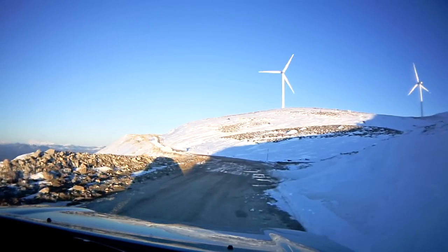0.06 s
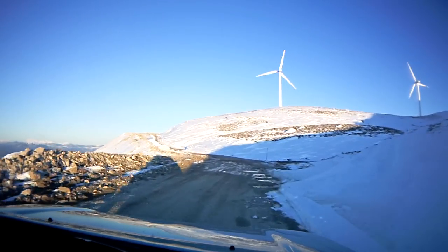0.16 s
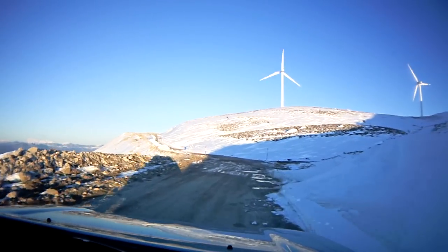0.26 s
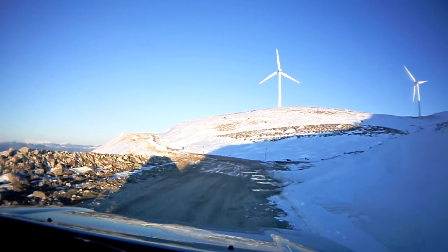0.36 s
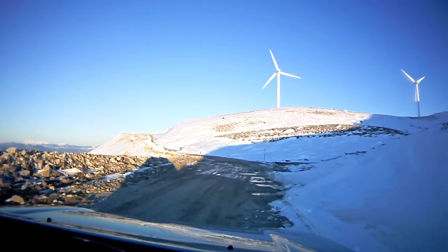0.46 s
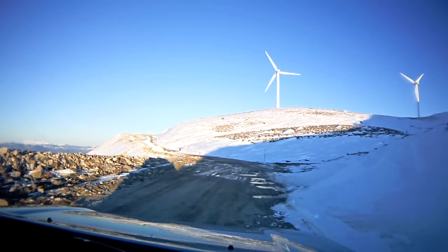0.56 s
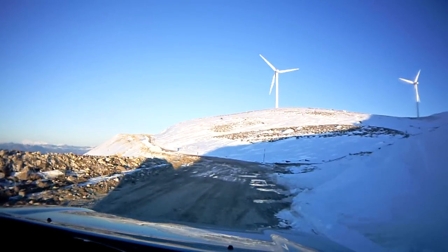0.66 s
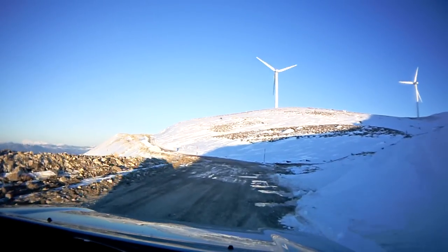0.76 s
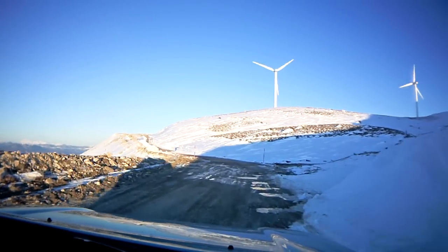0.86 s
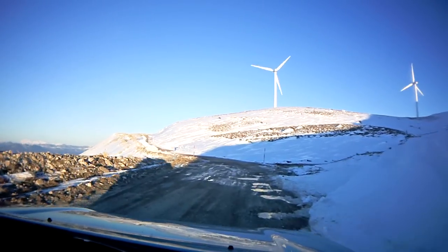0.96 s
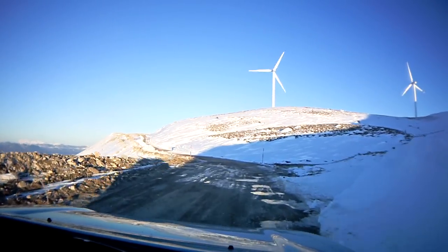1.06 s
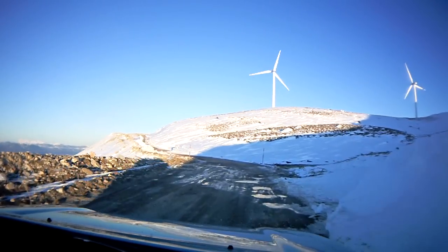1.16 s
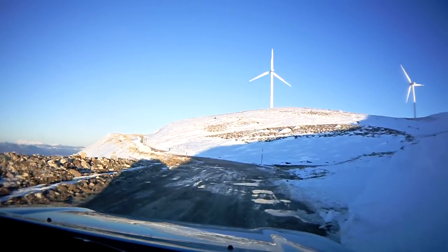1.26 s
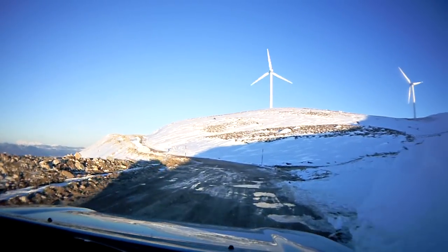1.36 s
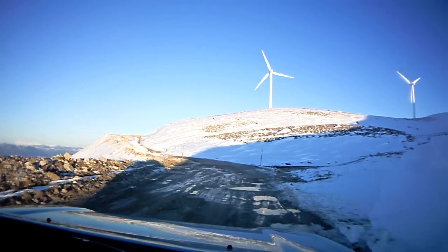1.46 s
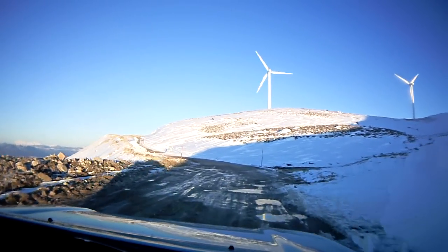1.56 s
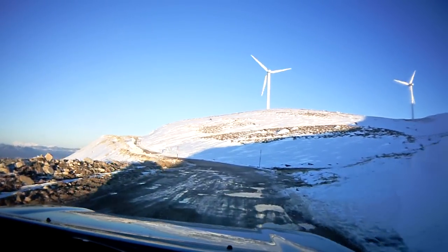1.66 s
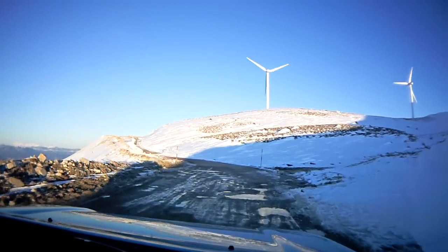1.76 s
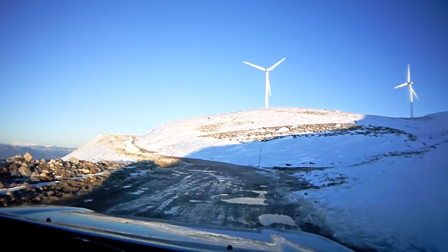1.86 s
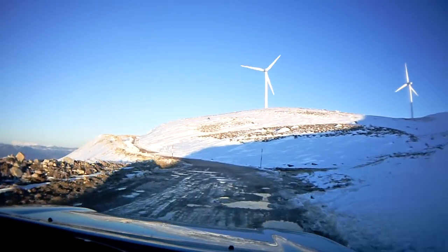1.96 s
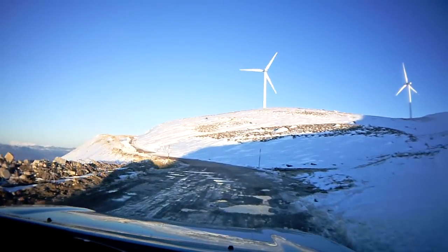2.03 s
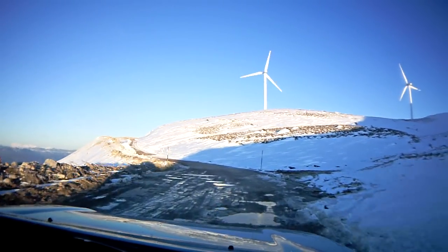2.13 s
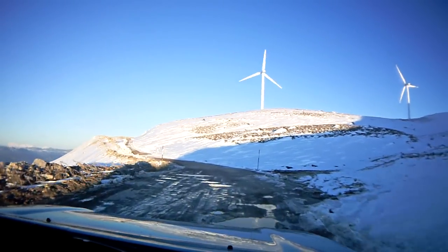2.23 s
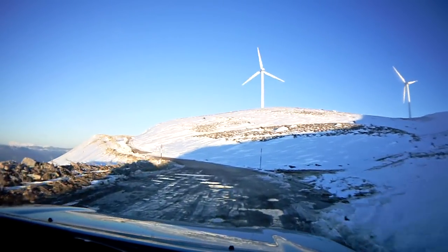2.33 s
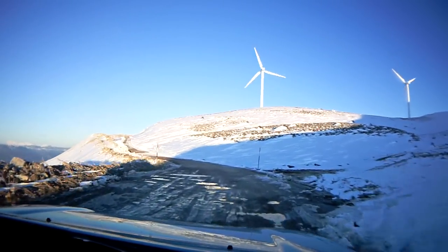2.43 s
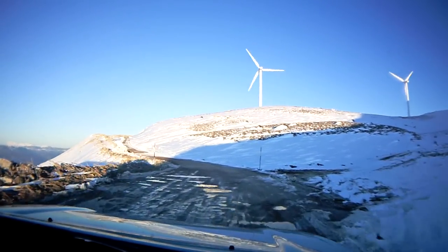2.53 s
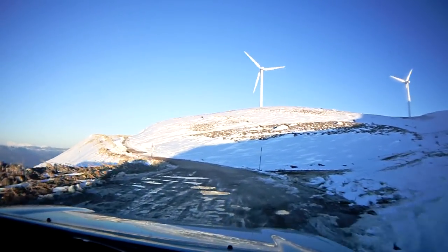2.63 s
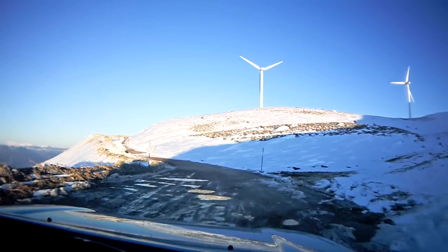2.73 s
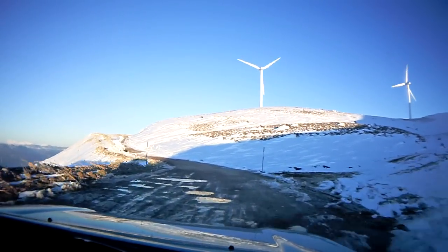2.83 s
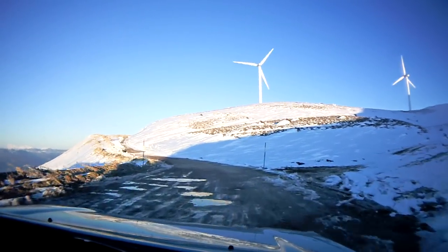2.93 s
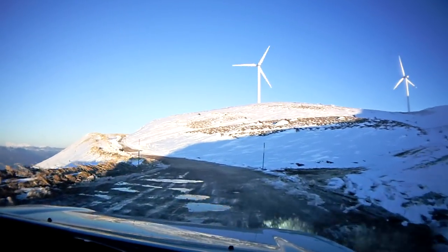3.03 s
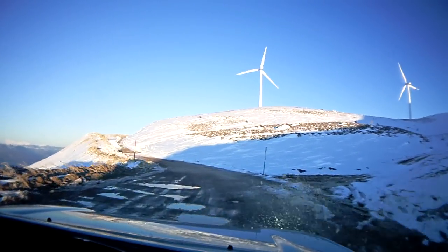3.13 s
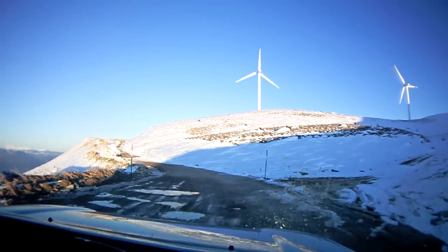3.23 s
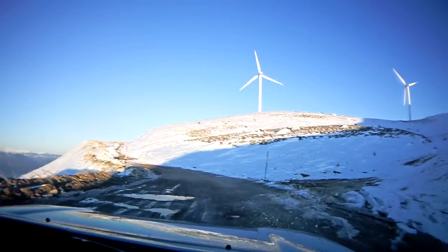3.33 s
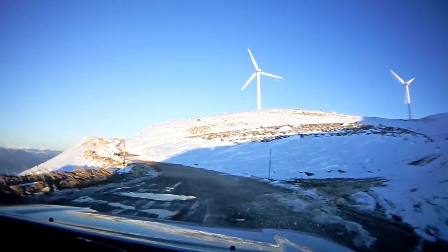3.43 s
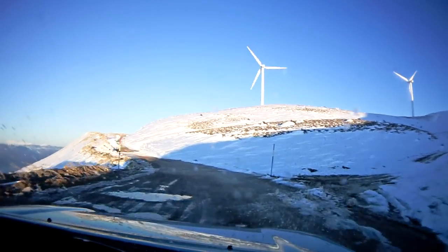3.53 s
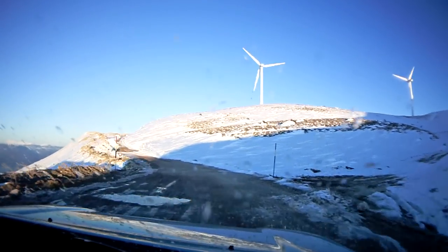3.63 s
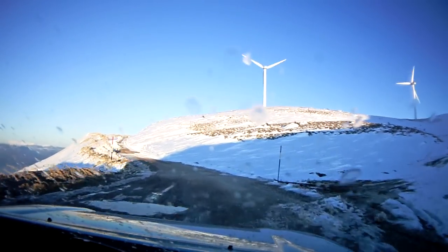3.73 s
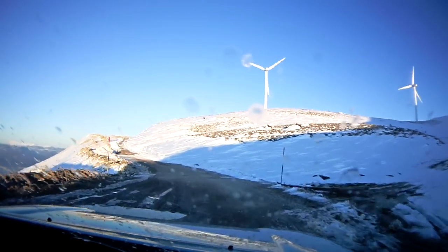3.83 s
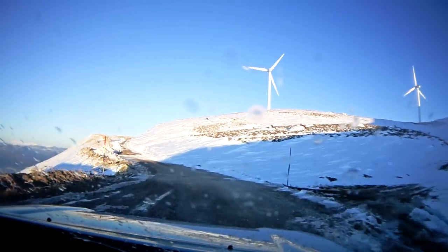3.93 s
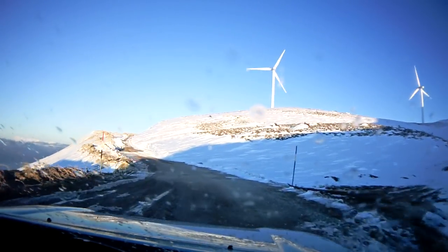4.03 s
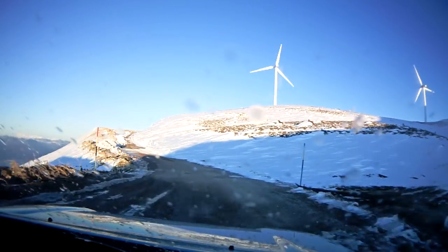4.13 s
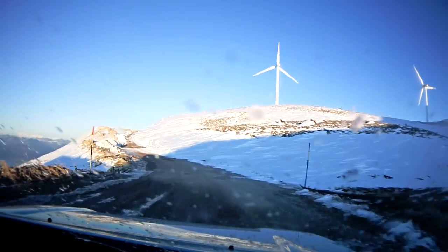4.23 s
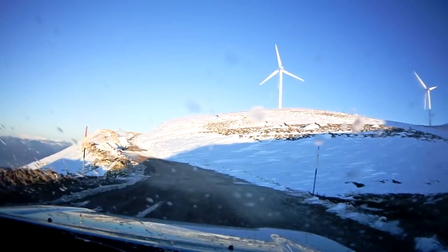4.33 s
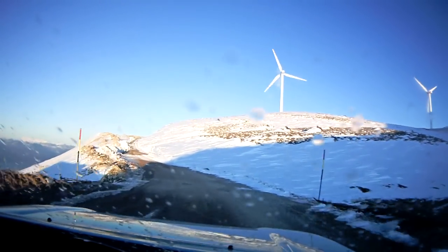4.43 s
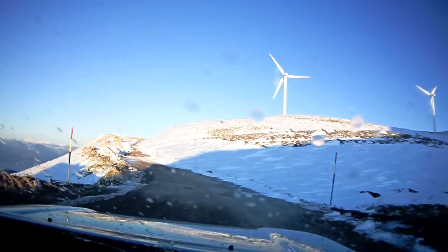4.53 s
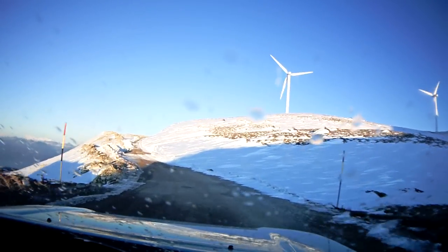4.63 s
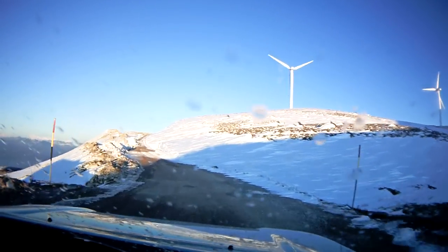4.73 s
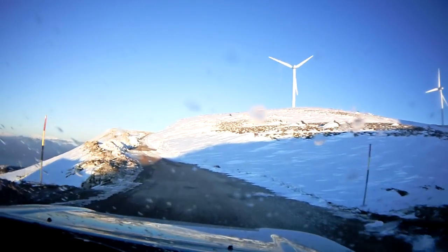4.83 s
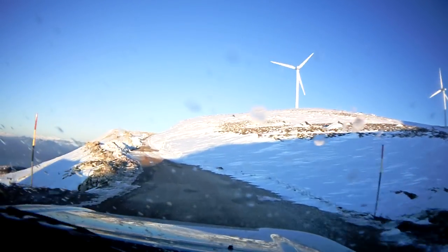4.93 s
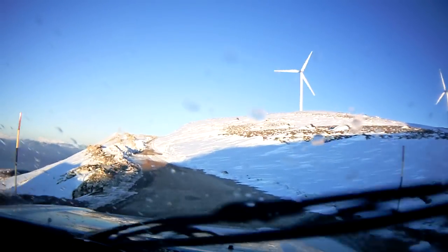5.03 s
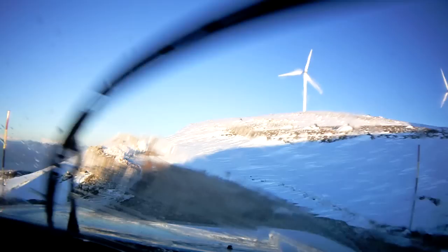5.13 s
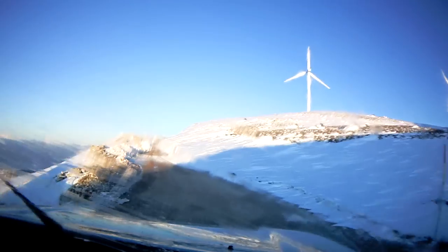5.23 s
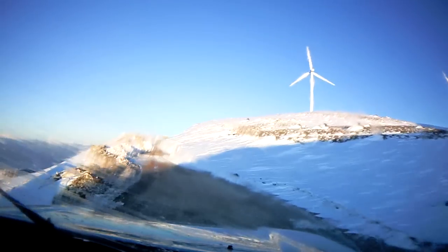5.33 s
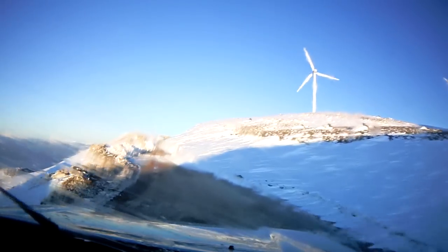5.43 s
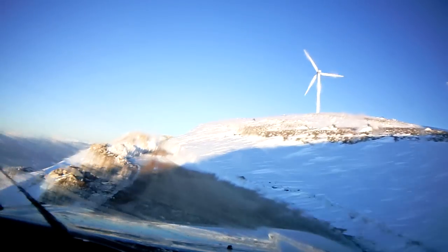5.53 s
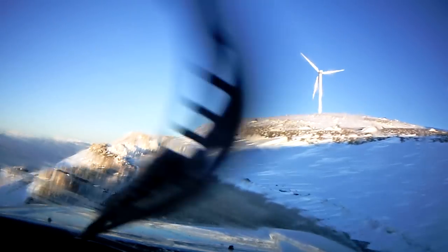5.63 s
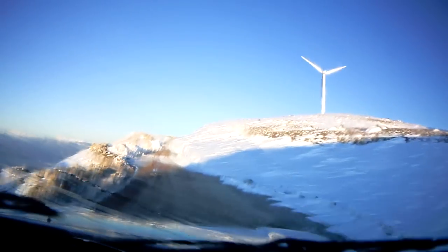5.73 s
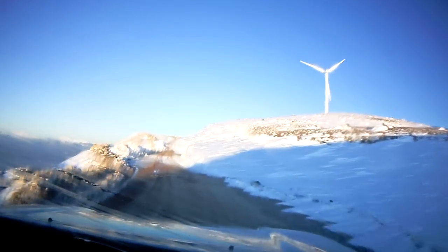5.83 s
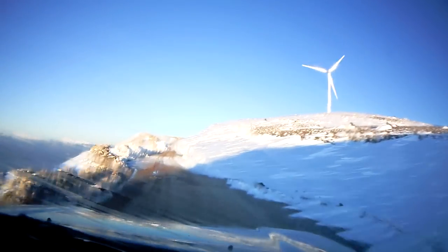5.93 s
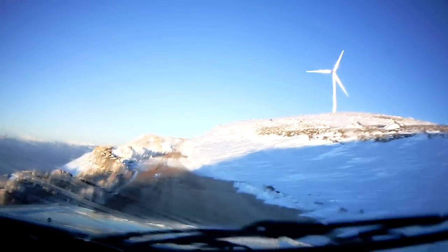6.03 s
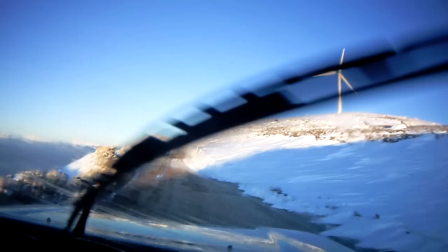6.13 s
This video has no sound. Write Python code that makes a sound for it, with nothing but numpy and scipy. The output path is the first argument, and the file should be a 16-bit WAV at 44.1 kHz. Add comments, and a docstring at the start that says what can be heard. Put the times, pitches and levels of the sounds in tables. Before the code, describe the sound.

Inside a car crawling along a slushy, snowy track, a low engine throb and road drone sit quietly under a thin whistling hiss. Loose plastic trim chatters in brief clusters. Around the middle, slush slaps the windscreen in sharp wet knocks. Near five seconds a wiper blade squawks across the glass, slides almost silently, then catches and judders again at the very end. Close microphone behind the windscreen, dry and boxy.

```python
"""Slushy drive with a juddering wiper

Inside a car crawling up a slushy track, an engine note and noise-driven air modes make the cab boom.
The road drones through the glass; shaped noise makes a treble hiss and whistling bands, sines a faint whine.
Loose trim rattles as short noise bursts, and slush slaps the windscreen as sharp pushes with scattered contacts.
A wiper blade judders and squeaks over the glass twice by stick-slip, catches, and slides quietly in between.
Road, slush and blade all ring the same windscreen resonances."""
import sys
import numpy as np
from scipy import signal
from scipy.fft import rfft, irfft, next_fast_len
from scipy.io import wavfile
from scipy.ndimage import uniform_filter1d, map_coordinates

SR = 44100
rng = np.random.default_rng(int(sys.argv[2]) if len(sys.argv) > 2 else 0)


def to_wav(s):
    """Save 16-bit WAV."""
    ch = np.atleast_2d(s).T  # columns
    pcm = np.round(np.clip(ch, -1, 1) * 32767)  # PCM
    wavfile.write(sys.argv[1], SR, pcm.astype(np.int16))


N = 272538  # length in samples

# Course of the cab's broadband noise.
# Each row: time in seconds, level of the upper hiss in dB, level of the road drone in dB.
CAB_LEVELS = [(0.0, -59.5, -58.5), (0.85, -55, -61), (1.22, -51.5, -60), (1.48, -52.5, -62),
              (1.61, -53.5, -61.5), (3.02, -58, -59.5), (3.62, -58.5, -57), (3.91, -59, -58.5),
              (5.9, -58, -60.5)]


def amp(db):
    """Level to amplitude: 20 dB are a factor of ten."""
    return 10 ** (np.asarray(db) / 20)


def unit(x):
    """Normalization to an rms of 1."""
    return x / np.sqrt(np.mean(x ** 2) + 1e-20)


def curves(rows):
    """Linear interpolation in time: one value per sample for each column after the time."""
    s, *cols = np.transpose(rows)
    return [np.interp(np.arange(N) / SR, s, c) for c in cols]


def wobble(rate):
    """Slow random modulation: a smooth curve through random knots, rate of them a second."""
    knots = rng.standard_normal(int(N * rate / SR) + 4)
    return map_coordinates(knots, [np.arange(N) * rate / SR])


def filtered(x, response):
    """Linear filtering: the spectrum of x times a complex response of frequency."""
    m = next_fast_len(N + SR // 2)
    return irfft(rfft(x, m) * response(np.fft.rfftfreq(m, 1 / SR)), m)[..., :N]


def colour(points):
    """Spectral envelope: gain through (Hz, dB) points on a log axis, -120 dB outside them."""
    f, db = np.transpose(points)
    return lambda hz: amp(np.interp(np.log(hz + 1), np.log(f + 1), db, -120, -120))


def resonances(modes):
    """Modal superposition: a causal response, neighbours in opposite phase; white noise keeps its rms."""
    def raw(f):
        total = 0
        for k, (centre, width, db) in enumerate(modes):
            damping = 1j * f * width
            total = total + (-1) ** k * amp(db) * damping / (centre * centre - f * f + damping)
        return total
    return lambda hz: raw(hz) / np.sqrt(np.mean(np.abs(raw(hz)) ** 2))


def noise(patchy_db):
    """Non-stationary noise: white noise with patches of random gain in time and frequency."""
    z = signal.stft(rng.standard_normal(N + 512), nperseg=512)[2]
    field = uniform_filter1d(rng.standard_normal(z.shape), size=3, axis=0)
    field = uniform_filter1d(field, size=5, axis=1)
    patchy = signal.istft(z * amp(patchy_db * unit(field)), nperseg=512)[1]
    return unit(patchy[:N])


def fade(start_s, end_s, fade_s):
    """Amplitude envelope: linear fades within a span of time."""
    t = np.arange(N) / SR
    return np.clip(np.minimum(t - start_s, end_s - t) / fade_s, 0, 1)


def glass(force, upper_db):
    """Forced vibration: a force rings two groups of pane modes, which pass little treble and little bass."""
    # Resonances of windscreen and dash.
    # Each row: frequency in Hz, bandwidth in Hz, relative level in dB.
    lower_modes = [(577, 66, -12.5), (757, 21, -5), (880, 88, -4), (1082.3, 46, 8), (1181, 69, -1.5)]
    upper_modes = [(1349.4, 100, -6.5), (1539, 145, 1), (1742, 141, 1.5), (1952, 145, -3), (2920, 80, -14),
                   (3330, 370, -25.5)]
    lower = force / np.sqrt(1 + amp(upper_db) ** 2)
    upper = lower * amp(upper_db)
    ring = filtered(lower, resonances(lower_modes)) + filtered(upper, resonances(upper_modes))
    ring = signal.sosfilt(signal.butter(N=2, Wn=600, btype="high", fs=SR, output="sos"), ring)
    low = signal.butter(N=4, Wn=2000, fs=SR, output="sos")
    return ring * amp(-10.5) + signal.sosfilt(low, ring)


def cab_boom():
    """Cavity resonance: an engine note and the cab's air modes throb together over a steady rumble."""
    # Common level of engine note and boom before their balance.
    # Each row: time in seconds, level in dB.
    throb_levels = [(0.0, -59.5), (0.22, -62), (0.27, -47), (0.4, -61.5), (1.2, -50.5), (1.29, -60),
                    (1.36, -49.5), (1.48, -60.5), (1.65, -48), (1.72, -58.5), (2.89, -60.5), (2.96, -41.5),
                    (3.05, -58), (3.51, -52), (3.67, -79), (3.79, -52), (3.91, -62), (3.96, -54),
                    (4.61, -59.5), (4.65, -46), (4.77, -54), (5.92, -56), (5.97, -51), (6.18, -51)]
    # Cab air modes. Each row: frequency in Hz, bandwidth in Hz, relative level in dB.
    air_modes = [(75.3, 14, -3), (101.5, 16.9, -6), (185.6, 16.3, -8)]
    # Rumble spectrum. Each row: frequency in Hz, relative density in dB per Hz.
    rumble_spectrum = [(10, -31), (22, 3.5), (45, -2), (140, -7.5), (260, -16.5), (450, -18), (900, -13.5)]
    engine_hz = 75.7  # mean pitch
    throb = amp(curves(throb_levels)[0] + 1.0 * wobble(7.7))
    engine = np.sqrt(2) * np.sin(2 * np.pi * np.cumsum(engine_hz + 4 * wobble(8.2)) / SR)
    boom = unit(filtered(rng.standard_normal(N), lambda hz: resonances(air_modes)(hz) * (hz < 320)))
    rumble = unit(filtered(rng.standard_normal(N), colour(rumble_spectrum)))
    throbbing = throb * (amp(-1.7) * engine + amp(-8.5) * boom)
    return throbbing + amp(-66) * boom + amp(-63) * rumble


def road_drone():
    """Structure-borne sound: the road shakes the glass with broadband noise."""
    road_db = curves(CAB_LEVELS)[1]
    return amp(road_db) * unit(glass(noise(patchy_db=1.5), upper_db=4.0))


def hiss():
    """Shaped broadband noise: its upper part swells and flickers, its lower part keeps one level."""
    # Hiss spectrum. Each row: frequency in Hz, relative density in dB per Hz.
    hiss_spectrum = [(1290, -58), (2200, -23.5), (2700, -24), (2930, -17.5), (3540, -25.5), (4110, -13),
                     (5620, -2.5), (5850, 1), (6090, -3), (6570, -15.5), (7890, -19.5), (8730, -16.5),
                     (9470, -24), (10700, -15), (11200, -18.5), (14500, -63), (22000, -120)]
    lower_db, swell_hz = -54.5, 3800  # gain below the edge, edge frequency
    hiss_db = curves(CAB_LEVELS)[0]
    whole = unit(filtered(noise(patchy_db=2.5), colour(hiss_spectrum)))
    under = filtered(whole, lambda hz: hz < swell_hz)
    swell = amp(hiss_db + 0.4 * wobble(30) + 0.47 * wobble(8))
    return amp(lower_db) * under + swell * (whole - under)


def whistles():
    """Narrow-band filtering: each band of noise fades in, stays at its pitch and fades out."""
    # Whistling bands.
    # Each row: start in seconds, end in seconds, frequency in Hz, width setting in Hz, level in dB.
    bands = [(2.2, 5.35, 5915, 55, -62), (.95, 1.75, 6000, 45, -60), (.4, 1.2, 5880, 100, -63),
             (.4, 3.3, 5335, 55, -64), (5.1, 6.3, 5310, 55, -67), (3.6, 5.2, 5330, 45, -73),
             (3.6, 5.1, 4170, 70, -75), (5.1, 5.9, 4220, 40, -72), (.8, 2.2, 6750, 300, -68),
             (.4, 2.2, 7500, 100, -73), (3.5, 5.9, 7140, 100, -78), (2.3, 5.2, 8290, 100, -79),
             (.5, 1.7, 8710, 70, -77), (-.2, 6.3, 9630, 130, -81), (-.2, 6.3, 10600, 200, -75)]
    air = noise(patchy_db=3.0)
    total = np.zeros(N)
    for start, end, hz, width, db in bands:
        # two equal resonant stages in series
        band = unit(filtered(air, lambda f: (width / (width + 2j * (f - hz))) ** 2))
        total += amp(db) * fade(start, end, fade_s=0.14) * band
    return total


def whine():
    """Harmonic tone: a thin, slightly unsteady fundamental and its third harmonic come and go."""
    # Course of the whine.
    # Each row: time in seconds, mean frequency in Hz, level in dB before the wobble.
    whine_course = [(.8, 1345, -88), (1.15, 1345, -71), (1.85, 1335, -71), (2.1, 1335, -88)]
    hz, db = curves(whine_course)
    phase = 2 * np.pi * np.cumsum(hz + 8 * wobble(15)) / SR
    return amp(db + 4.2 * wobble(12)) * (np.sin(phase) + amp(-4) * np.sin(3 * phase))


def rattles():
    """Repeated impact: loose plastic chatters for milliseconds; faint rattles fill rough stretches at random."""
    # Trim rattles. Each row: start in seconds, nominal peak of the body in dB.
    trim_hits = [(0.192, -49), (0.219, -51), (0.2487, -43), (0.3077, -44.5), (0.332, -49.5), (0.3616, -53),
                 (1.8, -52), (1.8562, -52), (1.951, -47), (2.0047, -48.5), (2.056, -52.5), (2.175, -53),
                 (2.1999, -44), (2.2265, -54), (2.2553, -45), (2.3036, -46), (2.3267, -52.5), (2.3516, -55),
                 (2.4114, -50), (2.4575, -47.5), (2.486, -58), (2.5072, -49), (2.5404, -54),
                 (2.5616, -47.5), (2.636, -49), (2.877, -50.5), (2.9457, -43), (2.961, -43.5), (2.977, -45),
                 (3.1946, -56), (3.209, -47.5), (3.3036, -49), (3.3313, -51), (3.362, -49), (3.3907, -47),
                 (3.4062, -48.5), (3.4333, -46.5), (3.4564, -41), (3.488, -41), (3.5144, -49),
                 (3.5382, -46), (3.5897, -52), (3.6226, -55), (4.525, -53.5), (4.5762, -48.5),
                 (4.6428, -48), (4.7107, -54), (4.782, -47), (4.8035, -54), (4.8224, -47.5), (5.503, -54),
                 (5.524, -52), (5.5538, -47.5)]
    # Dull ticks of grit, without the bright top. Each row: start in seconds, nominal peak in dB.
    grit_ticks = [(3.725, -41.5), (3.821, -38.5), (6.024, -44)]
    # Rough stretches filled with faint rattles. Each row: start in seconds, end in seconds.
    rough_stretches = [(.15, .4), (1.58, 2.7), (3.25, 3.72), (4.5, 4.85), (5.45, 5.65)]
    # Spectra of rattle body and bright top. Each row: frequency in Hz, relative density in dB per Hz.
    body_spectrum = [(1200, -1), (1900, -6), (2300, -6.5), (3090, -0.5), (3740, -18), (4250, 1), (4500, 1)]
    top_spectrum = [(4300, -52), (4700, -2.5), (5330, 0.5), (6140, -6.5), (6900, -11.5), (8000, -10.5),
                    (9200, -13.5), (11000, -9.5)]
    faint_hz, faint_db, faint_spread_db = 30.46, -63.5, 5.5  # mean rate, mean peak, its deviation
    rise_s, hold_end_s, t60_s = 0.00035, 0.0084, 0.0017  # attack, start of decay, time to fall 60 dB
    crest_db = 7  # nominal peak over rms
    bright_db = 2  # bright top over the body

    t = np.arange(SR // 20) / SR
    decay_db = -60 * np.clip(t - hold_end_s, 0, 1) / t60_s
    shape = np.clip(t / rise_s, 0, 1) * amp(-crest_db + decay_db)

    gap, size = rng.random(200) + .5, rng.standard_normal(200)
    faint = [(s, faint_db + faint_spread_db * z)
             for s, z in zip(np.cumsum(gap / faint_hz), size)
             if any(a < s < b for a, b in rough_stretches)]

    trim, grit = np.zeros(N + SR), np.zeros(N + SR)
    for s, db in [*trim_hits, *faint]:
        trim[round(s * SR):][:len(t)] += amp(db) * shape
    for s, db in grit_ticks:
        grit[round(s * SR):][:len(t)] += amp(db) * shape

    chatter = amp(1.8 * wobble(400))
    plastic = unit(filtered(rng.standard_normal(N), colour(body_spectrum)))
    bright = unit(filtered(rng.standard_normal(N), colour(top_spectrum)))
    return chatter * ((trim + grit)[:N] * plastic + amp(bright_db) * trim[:N] * bright)


def blows():
    """Impulsive excitation: slush and blade catches push the glass sharply, then scatter smaller contacts."""
    # Slush on the glass. Each row: time in seconds, nominal peak in dB,
    # upper over lower resonances in dB, time for the scatter to fall 60 dB in seconds.
    slush_slaps = [(2.921, -15.5, 11, 0.098), (2.943, -29, 8, 0.33), (3.035, -25.5, 11, .1),
                   (3.049, -30.5, 6, 0.2), (3.245, -14.5, 9, 0.09), (3.251, -26, 8, 0.093),
                   (3.283, -31, 8, 0.33), (3.337, -34.5, 7, 0.083), (3.358, -20, 6.5, 0.12),
                   (3.386, -38, 4, 0.3), (3.477, -40, 27, 0.039), (3.509, -40.5, 23, 0.062),
                   (3.726, -25, 17, 0.075), (3.783, -27.5, 3.5, 0.058), (3.824, -20.5, 5, 0.036),
                   (3.829, -24.5, 13.5, 0.06)]
    # Catches of the blade. Each row: time in seconds, nominal peak in dB, upper over lower resonances in dB.
    blade_catches = [(5.927, -17, 8), (5.933, -15.5, -1), (5.941, -14.5, 5), (5.956, -18, -5),
                     (5.98, -18, 8), (6.017, -24, 9), (6.025, -34, 14), (6.037, -16, 12), (6.052, -31, 6),
                     (6.063, -22, 4.5), (6.08, -35, 1), (6.092, -20, 1.5), (6.122, -22.5, 4),
                     (6.132, -26.5, 2)]
    slush_scatter_db, catch_scatter_db, catch_t60_s = -22, -32, 0.14
    push_db = 13.5  # force over the nominal peak that it rings up

    t = np.arange(SR // 4) / SR
    force, upper = np.zeros(N + SR), np.zeros(N + SR)
    rows = [(*r, slush_scatter_db) for r in slush_slaps]
    rows += [(*r, catch_t60_s, catch_scatter_db) for r in blade_catches]
    grains = rng.standard_normal((len(rows), 2, len(t)))
    for (s, db, upper_db, t60, scatter_db), grit in zip(rows, grains):
        ragged_edge = 0.22 * grit[0] * amp(-20 * t / 0.0047)
        scatter = amp(scatter_db - 60 * t / t60) * grit[1]
        hit = ragged_edge + scatter
        hit[0] += 0.7  # the sharp push
        start = round(s * SR) - 40  # the push leads the listed time by 40 samples
        force[start:][:len(t)] += amp(db + push_db) * hit
        upper[start:] = upper_db  # holds until the next blow
    band = signal.butter(N=1, Wn=[750, 2600], btype="band", fs=SR, output="sos")
    return glass(signal.sosfilt(band, force[:N]), upper[:N])


def stick_slip():
    """Stick-slip friction: slips at a near-steady rate, often strong-weak; roughness scatters them and scrapes."""
    # How the rubber grips. Each row: time in seconds, mean slip rate in Hz,
    # roughness from 0 to 1, strong-weak alternation from 0 to 1.
    grip = [(4.9, 186, .45, .3), (4.95, 185, .4, .25), (5.012, 190, .4, .2), (5.03, 221, .3, 0),
            (5.085, 214, .1, 0), (5.12, 216, .1, 0), (5.92, 185, .6, .3)]
    spread_s = .005  # lag of the lowest bending waves behind the treble on their way along the pane
    rate, rough, uneven = curves(grip)
    count = np.floor(np.cumsum(rate * (1 + 0.0495 * rough * wobble(120))) / SR)
    alternation = (1 + uneven * (-1) ** count) / np.sqrt(1 + uneven ** 2)
    size = alternation * amp(1.7 * rough * wobble(220))
    slips = np.diff(count, prepend=0) * np.sqrt(SR / rate) * size
    # soft rubber lets go without an edge
    slips = signal.sosfilt(signal.butter(N=3, Wn=2400, fs=SR, output="sos"), slips)

    def dispersion(hz):
        """Bending-wave dispersion: the lag shrinks linearly to zero at 2400 Hz."""
        f = np.minimum(hz, 2400)
        return np.exp(-2j * np.pi * spread_s * f * (1 - f / 4800))

    slips = filtered(slips, dispersion)
    scrape = rng.standard_normal(N) * amp(1.1 * wobble(150))
    return np.sqrt(1 - rough) * slips + np.sqrt(rough) * scrape


def wiper_slides():
    """Sliding friction: the wet blade glides quietly, with short scrapes, as noise on the glass."""
    # Slides and scrapes. Each row: start in seconds, end in seconds, force level in dB.
    slide_spans = [(5.13, 5.447, -54), (5.2, 5.248, -51), (5.439, 5.46, -42), (5.862, 5.923, -52)]
    sliding = sum(amp(db) * fade(a, b, fade_s=.008) for a, b, db in slide_spans)
    return glass(sliding * noise(patchy_db=2.5), upper_db=1.5)


def wiper_strokes():
    """Friction-driven resonance: the drag of the juddering blade shakes the glass and the wiper arm."""
    # Two blade strokes, one list of rows each.
    # Each row: time in seconds, drag force in dB, upper over lower resonances in dB.
    stroke_courses = [
        [(4.896, -35, -1), (4.906, -25.5, 2), (4.919, -21, -3), (4.93, -53, -1), (4.942, -28, -5),
         (4.957, -15.5, 2), (4.995, -17.5, 9.5), (5.019, -15.5, 3), (5.028, -25.5, 4), (5.05, -20.5, 10.5),
         (5.076, -24, -2.5), (5.088, -18, 7), (5.099, -17.5, 4.5), (5.108, -79, 6)],
        [(5.922, -29, 19), (5.93, -30, 1.5), (5.962, -32.5, -2), (5.968, -25.5, 4), (5.982, -23, 7),
         (5.996, -26, -5), (6.0, -32, 2), (6.027, -35.5, 2), (6.033, -61, 2), (6.042, -32, 2), (6.105, -34, -1),
         (6.115, -42, -2), (6.125, -30, 4), (6.143, -34, 0), (6.155, -65, -9), (6.18, -44, 2)],
    ]
    # Bending mode of the arm. Each row: frequency in Hz, bandwidth in Hz, relative level in dB.
    arm_modes = [(203, 33, 0)]
    # Share of the drag that shakes the arm. Each entry: gain in dB for one stroke.
    arm_shake_db = [-31, -19.5]
    drag_db, upper_db = curves(np.concatenate(stroke_courses))
    t = np.arange(N) / SR
    active = np.array([(t >= stroke[0][0]) & (t < stroke[-1][0]) for stroke in stroke_courses])
    force = active.sum(axis=0) * amp(drag_db) * stick_slip()
    arm = filtered(force * (amp(arm_shake_db) @ active), resonances(arm_modes))
    return arm + glass(force, upper_db)


def scene():
    """Superposition: all sources add at one listening point behind the windscreen."""
    background = cab_boom() + road_drone() + hiss() + whistles() + whine()
    return (background + rattles() + blows() + wiper_slides() + wiper_strokes())[None]


def record(dry):
    """Band limitation: the treble rolls off over 300 Hz to nothing at the upper limit."""
    top_hz = 11300
    return filtered(dry, lambda hz: np.clip((top_hz - hz) / 300, 0, 1) ** 2)


dry = scene()
out = record(dry)
to_wav(out)
```